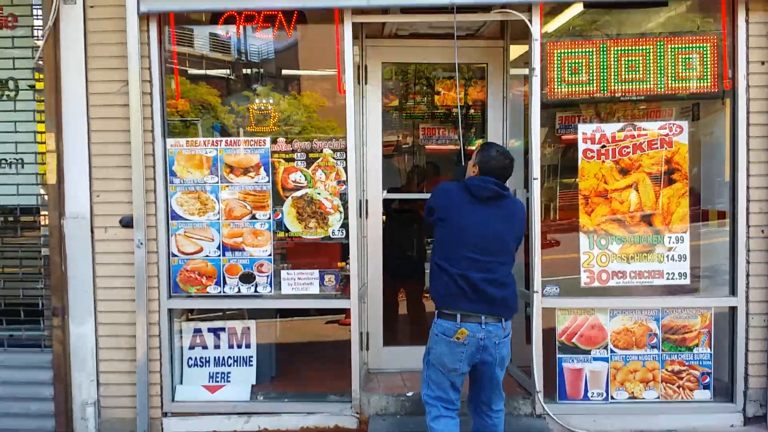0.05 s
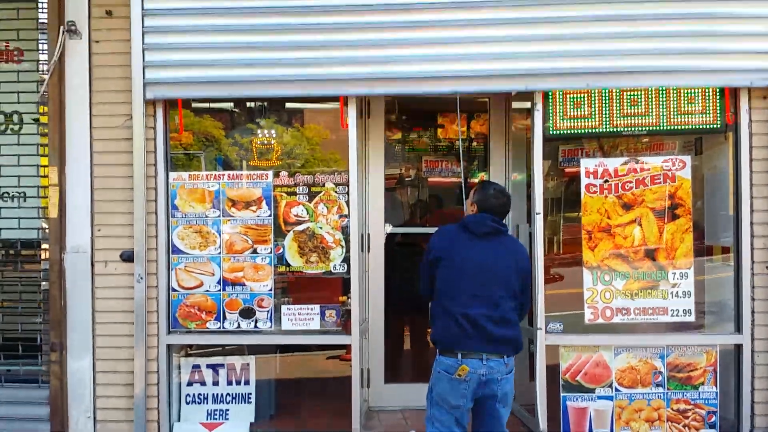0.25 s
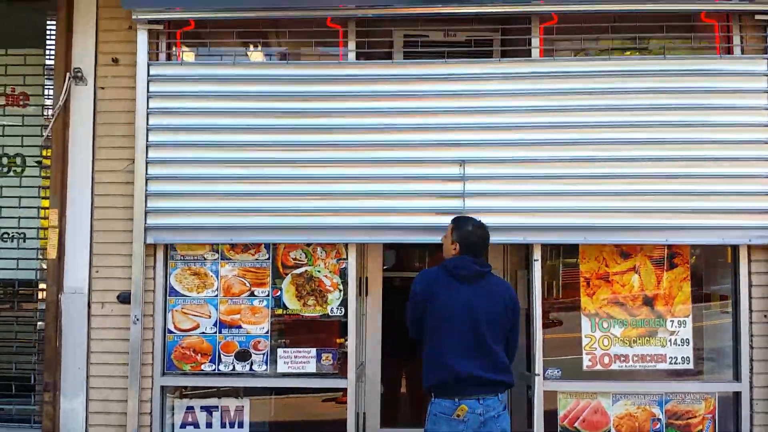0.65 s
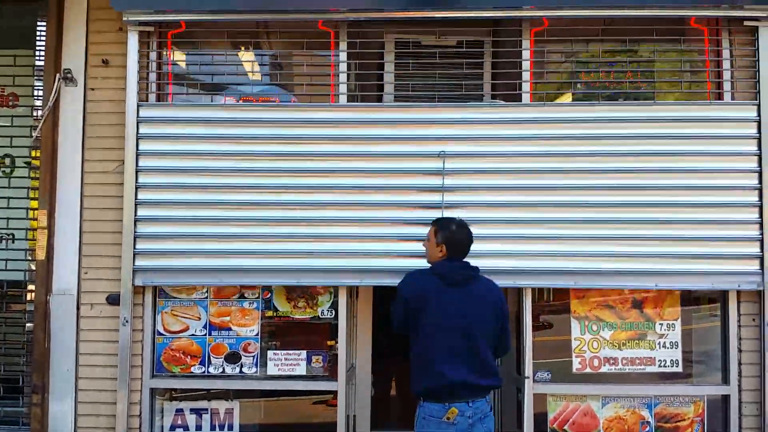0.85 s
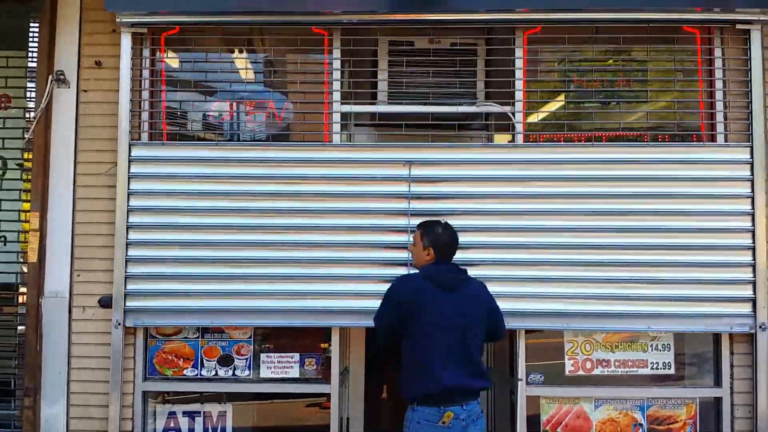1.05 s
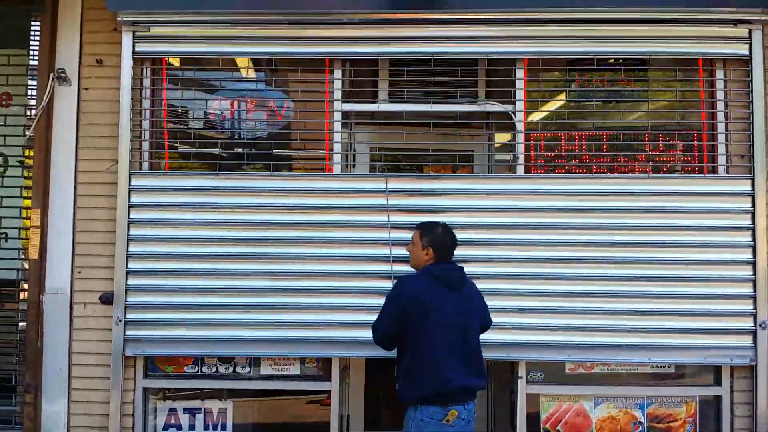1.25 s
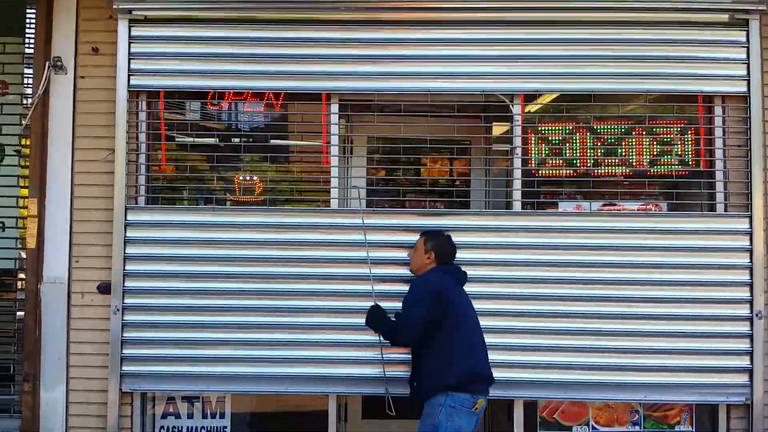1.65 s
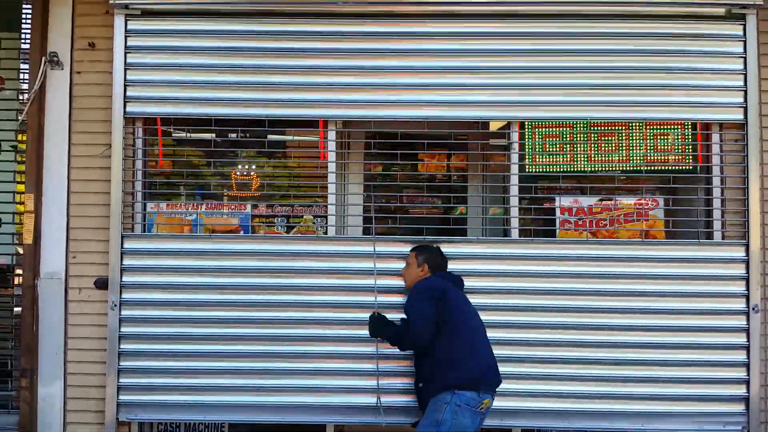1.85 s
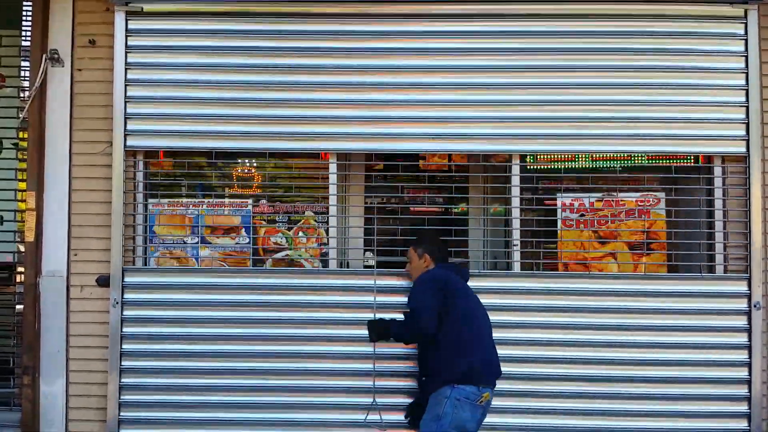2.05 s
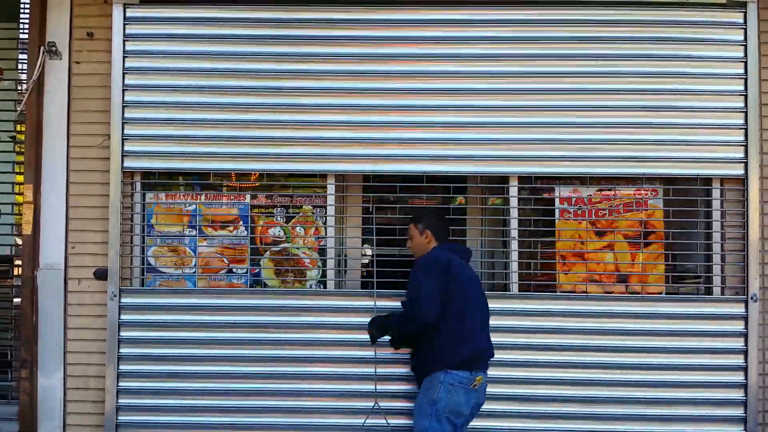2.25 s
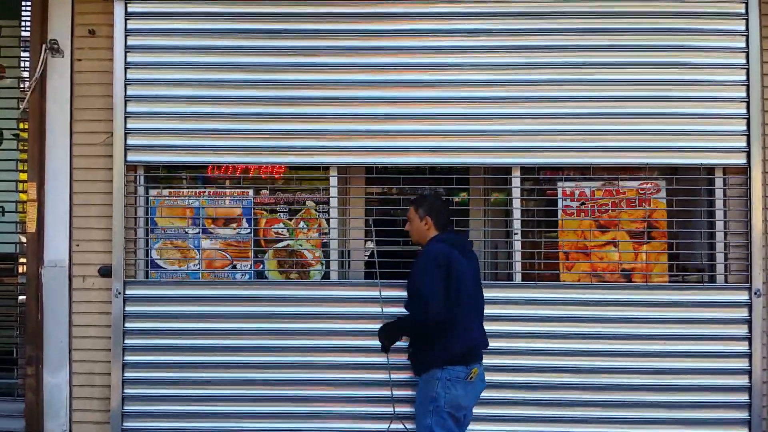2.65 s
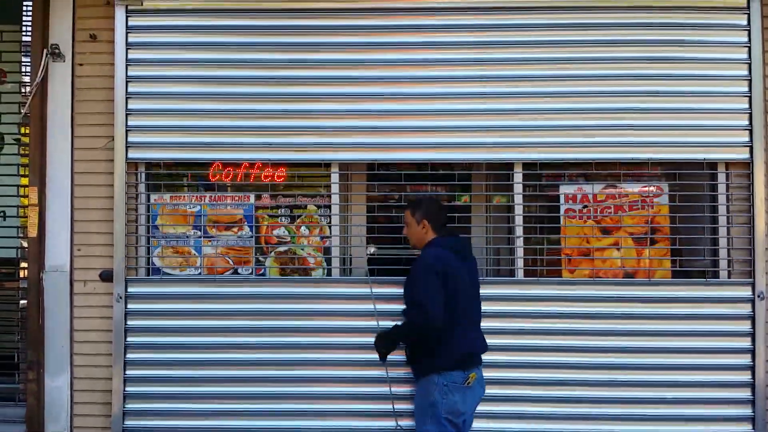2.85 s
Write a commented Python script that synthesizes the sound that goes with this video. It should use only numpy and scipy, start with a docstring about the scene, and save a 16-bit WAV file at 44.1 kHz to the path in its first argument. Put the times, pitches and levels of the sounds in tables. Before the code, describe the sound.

Steel shutter slats clatter and clang as they roll down, then knock and shiver to rest.

```python
"""Closing a roller shutter

A corrugated steel shutter is pulled down over a shopfront, heard from the pavement. Its slats chatter
in the guide rails and clash as they drop off the roll, each impact exciting damped modes of the steel.
Single slats twang; the hanging curtain drums, and thumps more often as it lengthens.
It stops with a knock, bumps once more and shivers out over a low street rumble."""
import sys
import numpy as np
from scipy import signal
from scipy.fft import rfft, irfft, next_fast_len
from scipy.io import wavfile

SR = 44100
rng = np.random.default_rng(int(sys.argv[2]) if len(sys.argv) > 2 else 0)


def bounce(signal):
    """Save signal as a 16-bit WAV file at the path given by the first command-line argument."""
    frames = np.transpose(np.atleast_2d(signal))
    limited = np.clip(frames, -1, 1)
    pcm = np.round(limited * 32767).astype(np.int16)
    wavfile.write(sys.argv[1], SR, pcm)


N = 132300

# Slat impacts. Each row: start in seconds, then clink level, its treble boost, clang and thud levels in dB.
SLAT_IMPACTS = [(0.177, -34.5, -7, -27, -38.5), (0.224, -36, 5, -23, -24), (0.266, -20, 1, -27, -32),
                (0.317, -17.5, -4, -19, -21.5), (0.4971, -18, 0, -16.5, -28.5),
                (0.57, -21.5, 1, -19.5, -30), (0.637, -21, 3, -23, -44), (0.663, -16, -4, -16, -39),
                (0.823, -26, 7, -21.5, -41), (0.91, -21, 4, -36, -39), (0.9854, -14.5, -1.5, -18, -33),
                (1.112, -19.5, -4, -17, -33), (1.2, -18.5, -1.5, -32, -46), (1.225, -24.5, -17, -18, -37),
                (1.2997, -18.5, -2, -35, -26), (1.345, -24.5, -9, -18.5, -27), (1.372, -22.5, -5, -22, -33),
                (1.4294, -18, 0.5, -32, -43), (1.465, -20, -4, -16, -29), (1.5706, -20.5, -1.5, -21.5, -41),
                (1.628, -20.5, -5.5, -19, -48), (1.687, -25, -1, -25, -49), (1.734, -19, 1, -20.5, -30),
                (1.764, -18, -8, -15.5, -32), (1.84, -20, -4, -28, -38), (1.9321, -20, -1, -32, -23),
                (2.0006, -20.5, 1, -20.5, -30), (2.04, -23.5, -7, -17, -28), (2.14, -21, -2, -24, -30),
                (2.255, -20, -1, -17.5, -19.5), (2.362, -20.5, -3, -19, -29), (2.543, -22, 1.5, -23, -22),
                (2.571, -21, -5, -21.5, -34), (2.695, -29.5, -5, -27, -35), (2.823, -35, -4, -39, -56),
                (2.94, -36, -6, -43, -47.0)]
# Shaking of the slats. Each row: time in seconds, rattle level in dB, scrape level in dB.
SHAKE_LEVELS = [(.17, -39, -44), (.21, -21.5, -26), (.25, -19.5, -20), (.34, -19.5, -19.5), (.42, -21, -22),
                (.69, -22, -21.5), (.76, -22, -23.5), (.9, -23, -26.5), (1.1, -20.5, -21.5),
                (1.4, -23, -34), (1.56, -23.5, -29), (1.74, -20.5, -24.5), (1.85, -20, -18.5),
                (2.08, -21, -22), (2.3, -19, -22), (2.48, -25.5, -26.5), (2.62, -31, -31),
                (2.8, -35.5, -38.5), (3, -37.5, -45)]
# Spectra of a slat's edge, its body and the curtain. Each row: frequency in Hz, spectral level in dB.
EDGE_SPECTRUM = [(700, -20), (2000, -7), (2850, -3.5), (3700, 1.5), (4500, -2.5), (6200, 2.5), (6900, -2),
                 (7600, 0), (8600, -4), (11000, -8.5), (12200, -16.5), (14500, -21)]
SLAT_SPECTRUM = [(200, -38), (380, -4.5), (480, -8.5), (640, -1), (760, -6.5), (1130, 0.5), (1350, -2),
                 (1720, 3.5), (2000, 1), (2400, -3), (3000, -6.5), (6000, -19), (14000, -52)]
CURTAIN_SPECTRUM = [(25, -40), (50, -19), (100, -9), (130, -5.5), (170, 0), (255, -0.5), (390, -2),
                    (480, -11), (900, -10), (3000, -44)]
EDGE_T60, SLAT_T60, CURTAIN_T60 = 0.23, 0.29, 0.24  # seconds to fall by 60 dB
TIME = np.arange(N) / SR


def amp(db):
    """Amplitude ratio of a level in decibels."""
    return 10 ** (np.asarray(db) / 20)


def unit(x):
    """Normalisation to an rms of 1."""
    return x / np.sqrt(np.mean(x ** 2) + 1e-20)


def decay(t, t60):
    """Exponential damping by 60 dB in t60 seconds."""
    return np.exp(-np.log(1000) * t / t60)


def along(points, hz):
    """Interpolation on a logarithmic frequency axis."""
    freqs, values = np.transpose(points)
    return np.interp(np.log(hz + 1), np.log(freqs + 1), values)


def curves(rows):
    """Linear interpolation in time of each column after the first."""
    times, *columns = np.transpose(rows)
    return [np.interp(TIME, times, column) for column in columns]


def add(out, start_s, sound):
    """Superposition of a sound from its start time, cut where the output ends."""
    span = out[:, round(start_s * SR):][:, :sound.shape[1]]
    span += sound[:, :span.shape[1]]


def filtered(x, response):
    """Linear filtering: the spectrum is multiplied by a frequency response."""
    size = x.shape[-1]
    padded = next_fast_len(size + 4096)
    hz = np.fft.rfftfreq(padded, 1 / SR)
    return irfft(rfft(x, padded) * response(hz), padded)[..., :size]


def diffuse(colour, size):
    """Partial coherence: coloured stereo noise, near mono in the bass and wide in the treble."""
    # Each row: frequency in Hz, side over mid in dB.
    width = [(60, -14.5), (280, -17.5), (700, -8.5), (1170, -1.5), (2740, 3), (4190, 1.5), (7000, 0)]
    def response(hz):
        side = amp(along(width, hz))
        return colour(hz) * np.array([np.ones_like(side), side]) / np.hypot(1, side)
    mid, side = filtered(rng.standard_normal((2, size)), response)
    return unit(np.array([mid + side, mid - side]))


def resonance(hz, centre_hz, q):
    """A Lorentzian peak, narrower as q rises."""
    return 1 / (1 + (2 * q * (hz / centre_hz - 1)) ** 2)


def ring(spectrum, t60, bright_db=0, ping_db=0):
    """Impulse response of steel, of unit energy: a crack, then dense modes dying away like damped noise."""
    # Each row: frequency in Hz, share of the treble boost.
    treble_share = [(5000, 0.07), (10000, 1)]
    ping_hz = 7080 * np.exp(0.16 * rng.standard_normal())  # each clink favours its own pitch
    def colour(hz):
        ping = ping_db * resonance(hz, ping_hz, q=11)
        return amp(along(spectrum, hz) + bright_db * along(treble_share, hz) + ping)
    t = np.arange(SR * 2 // 5) / SR
    crack = amp(3.5) * np.exp(-t / 0.0013)
    lingering = amp(-11) * decay(t, t60=0.68)  # late ring of steel and street
    sound = diffuse(colour, len(t)) * (crack + decay(t, t60) + lingering)
    return sound / np.sqrt(np.sum(sound ** 2) / 2)


def street():
    """Distant traffic: incoherent sources sum to a steady, low noise."""
    # Each row: frequency in Hz, spectral level in dB.
    spectrum = [(25, -26), (70, -10), (300, 0), (14000, -46)]
    return amp(-52) * diffuse(lambda hz: amp(along(spectrum, hz)), N)


def chatter(level_db, spectrum, t60, taps_per_s, scatter_db, spots, bright_db=0):
    """Impact rattling: each loose spot touches once a swing, at a random moment and strength, and rings."""
    out = np.zeros((2, N))
    for _ in range(spots):
        moment, strength, side = rng.random((3, SR // 100))
        onsets = ((np.arange(len(moment)) + moment) * spots / taps_per_s * SR).astype(int)
        impulses = amp(scatter_db * (2 * strength - 1)) * np.sign(side - .5)
        force = unit(np.bincount(onsets, impulses, N)[:N]) * amp(level_db)
        out += signal.fftconvolve(force[None], ring(spectrum, t60, bright_db), axes=1)[:, :N]
    return out / np.sqrt(spots)


def rail_scrape():
    """Sliding friction: slat ends tap along the rails and catch slightly just before each clash."""
    _, scrape_db = curves(SHAKE_LEVELS)
    lull_s, lull_db = 0.012, 0.5
    lulls = [np.exp(-((TIME - start + lull_s / 2) / lull_s) ** 2) for start, *_ in SLAT_IMPACTS]
    level_db = scrape_db + 0.5 - lull_db * np.max(lulls, axis=0)
    return chatter(level_db, EDGE_SPECTRUM, EDGE_T60, taps_per_s=240, scatter_db=8, spots=6, bright_db=-2.5)


def joint_rattle():
    """Play in the joints: repeated contacts excite the slats' modes."""
    rattle_db, _ = curves(SHAKE_LEVELS)
    return chatter(rattle_db + 2.5, SLAT_SPECTRUM, SLAT_T60, taps_per_s=220, scatter_db=5.5, spots=6)


def curtain_drum():
    """Forced vibration: the hanging curtain drums, and rumbles in its lowest mode."""
    # Each row: time in seconds, drumming level in dB.
    drum_levels = [(.18, -36), (.34, -23.5), (.43, -30), (.55, -26.5), (1.6, -26.5), (2.3, -25.5),
                   (2.5, -30), (2.6, -28), (2.7, -36.5), (2.88, -31.5), (3, -48)]
    level_db, = curves(drum_levels)
    drum = chatter(level_db - 1.5, CURTAIN_SPECTRUM, CURTAIN_T60, taps_per_s=260, scatter_db=3.5, spots=8)
    mode_hz, half_width_hz = 55.7, 3
    rumble = diffuse(lambda hz: 1 / (1 + ((hz - mode_hz) / half_width_hz) ** 2), N)
    return drum + amp(level_db - 27.5) * rumble


def strike(sound, falloff=1.4, contacts=7, run_s=0.014):
    """Multiple impact: a quick run of weakening contacts, each exciting the same ring."""
    fractions = (np.arange(contacts) + rng.uniform(0, 1, contacts)) / contacts
    fractions[0] = 0
    strengths = np.exp(-falloff * fractions) * rng.choice([-1, 1], contacts)
    out = np.zeros((2, SR))
    for fraction, strength in zip(fractions, strengths / np.linalg.norm(strengths)):
        add(out, fraction * run_s, strength * sound)
    return out


def slat_clashes():
    """Impact excitation: a slat dropping off the roll clinks at its edge, clangs and thuds the curtain."""
    out = np.zeros((2, N))
    for start, clink_db, bright_db, clang_db, thud_db in SLAT_IMPACTS:
        add(out, start, amp(clink_db + 32) * strike(ring(EDGE_SPECTRUM, EDGE_T60, bright_db, ping_db=3.5)))
        add(out, start, amp(clang_db + 29.5) * strike(ring(SLAT_SPECTRUM, SLAT_T60)))
        add(out, start, amp(thud_db + 28.5) * ring(CURTAIN_SPECTRUM, CURTAIN_T60))
    return out


def mode_clusters(blows, q, rise_s=0.0038):
    """Free vibration: at each blow a band of modes around one pitch swells and decays."""
    out = np.zeros((2, N))
    t = np.arange(SR // 2) / SR
    envelope = (1 - np.exp(-t / rise_s)) * decay(t, t60=0.25)
    for start, level_db, pitch_hz in blows:
        modes = diffuse(lambda hz: resonance(hz, pitch_hz, q), len(t))
        add(out, start, amp(level_db) * unit(envelope * modes))
    return out


def curtain_thumps():
    """Broad, low resonance: the curtain slaps its rails and throbs."""
    # Each row: start in seconds, level in dB, pitch in Hz.
    thumps = [(.322, -36, 287), (.55, -42.5, 260), (1.752, -36.5, 405), (2.036, -35.5, 259),
              (2.092, -37.5, 256), (2.146, -33.5, 256), (2.218, -33.5, 252), (2.26, -35, 248),
              (2.362, -34, 256), (2.408, -32.5, 254), (2.452, -37, 252), (2.542, -35, 308),
              (2.868, -45.5, 347)]
    return mode_clusters(thumps, q=5.5)


def slat_twangs():
    """Bending resonance: a shaken slat sings out in a narrow band."""
    # Each row: start in seconds, level in dB, pitch in Hz.
    twangs = [(.5, -35, 1170), (.558, -33, 1210), (.645, -31.5, 2030), (.688, -33, 1600),
              (1.33, -33.5, 1410), (1.732, -34, 1120), (1.865, -32, 1740), (1.952, -34.5, 1105),
              (2.005, -34, 1710), (2.036, -34.5, 1110), (2.138, -40, 1110), (2.254, -37, 1750),
              (2.38, -36.5, 1790)]
    return mode_clusters(twangs, q=8.4)


def end_knock():
    """Broadband excitation by a hard impact: the bottom bar lands with one bright knock."""
    # Each row: frequency in Hz, spectral level in dB.
    spectrum = [(120, -19), (230, 6), (500, 0.5), (1000, 1), (1800, -5), (3200, -7.5), (6000, 1.5),
                (9500, -4), (14500, -11.5)]
    out = np.zeros((2, N))
    add(out, start_s=2.324, sound=amp(19.5) * strike(ring(spectrum, t60=0.4), falloff=4.2))
    return out


def scene():
    """Superposition of shutter and street; the shutter's din dips briefly here and there."""
    # Each row: centre time in seconds, depth in dB.
    dips = [(.486, 2.5), (1.417, 3), (1.555, 3.5), (2.211, 1), (2.315, 7.5)]
    half_dip_s = 0.017
    dip_db = sum(depth * np.exp(-((TIME - centre) / half_dip_s) ** 2) for centre, depth in dips)
    din = rail_scrape() + joint_rattle() + curtain_drum() + slat_clashes()
    return din * amp(-dip_db) + end_knock() + curtain_thumps() + slat_twangs() + street()


def record(dry):
    """Band limiting and clipping, with a different colour on each side and silence before the onset."""
    # Each row: frequency in Hz, left over right in dB.
    balance = [(100, -3), (1200, -2), (1800, -3.5), (2740, .5), (4190, 3.5), (6400, 3), (9800, -4.5),
               (15000, -8)]
    onset_s, low_cut_hz, top_hz = 0.174, 53, 14750
    def response(hz):
        high_pass = hz ** 2 / np.hypot(hz ** 2, low_cut_hz ** 2)
        return amp(along(balance, hz) * np.array([[.5], [-.5]])) * high_pass
    gated = np.clip(filtered(dry, response), -1, 1) * (TIME >= onset_s)
    return filtered(gated, lambda hz: 1 / (1 + (hz / top_hz) ** 120))


dry = scene()
out = record(dry)
bounce(out)
```